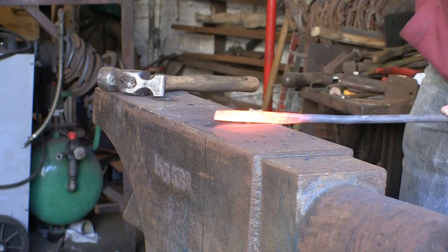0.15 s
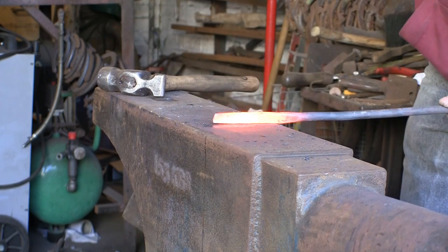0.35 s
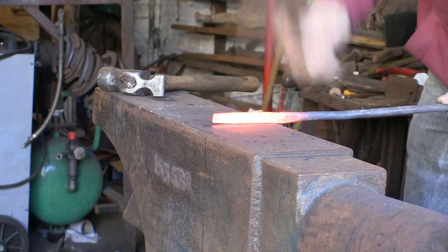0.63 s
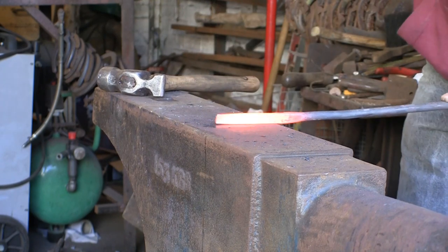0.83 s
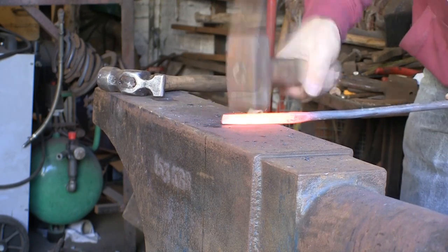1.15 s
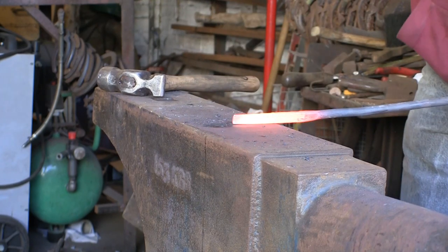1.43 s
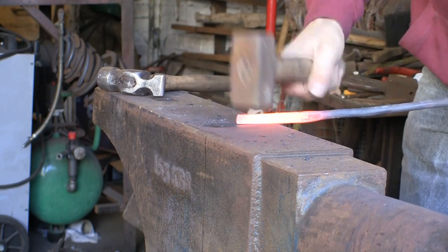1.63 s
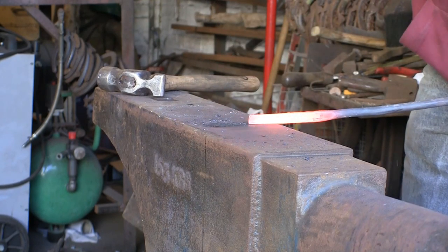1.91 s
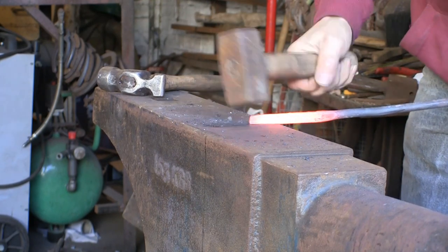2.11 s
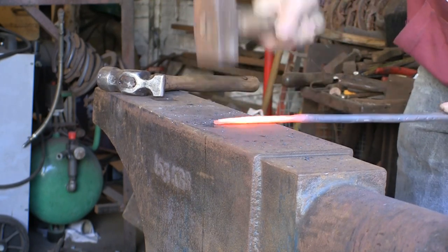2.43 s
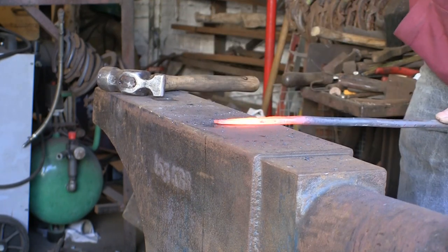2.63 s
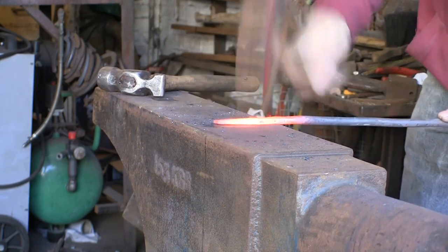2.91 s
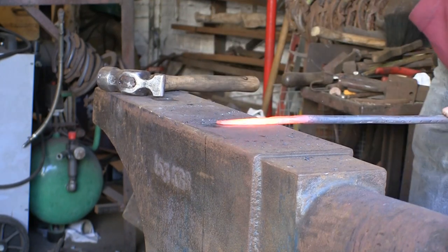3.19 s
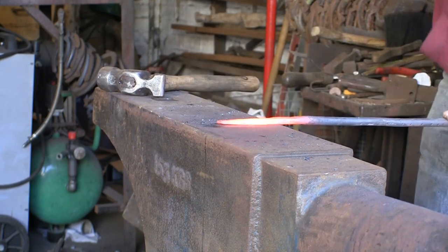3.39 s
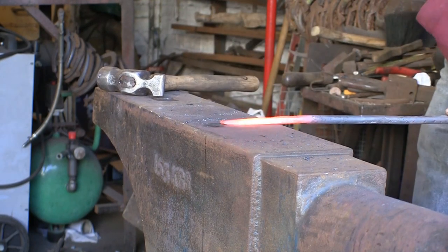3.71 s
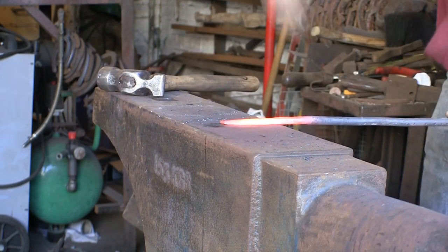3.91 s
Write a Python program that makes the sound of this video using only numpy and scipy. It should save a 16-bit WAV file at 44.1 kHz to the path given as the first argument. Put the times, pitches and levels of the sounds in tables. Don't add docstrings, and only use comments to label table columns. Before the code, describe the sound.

Forging at an anvil, heard close in stereo inside a cluttered workshop. Only a faint low blower rumble with a wavering, slowly rising blade hum and airy hiss is heard at first, plus a very quiet steady motor whine on the right. At 0.77 s a hand hammer hits the hot bar: a short midrange crack with a clear, bright anvil ring. Similar blows follow at 1.27 and 1.74 s, and a duller, less bright one at 2.2 s. At 2.37 s the bar is laid flat with a quick double clink, then tiny gritty flakes crackle near 2.44 s. Two harder blows at 3.04 and 3.56 s have less body, more steel-on-steel slap and glittering treble. Every blow leaves close echoes, a dense tail of a few tenths of a second and faint metallic shivering from surrounding tools. At about 4.03 s a soft, dull wooden knock closes it.

```python
import sys
import numpy as np
from scipy import signal
from scipy.io import wavfile

SR = 44100
rng = np.random.default_rng(int(sys.argv[2]) if len(sys.argv) > 2 else 0)


def store_wav(level_fs):
    pcm = np.round(np.clip(np.atleast_2d(level_fs), -1, 1) * 32767)
    wavfile.write(sys.argv[1], SR, pcm.T.astype(np.int16))


def boost(x):
    u = np.asarray(x, float) / 20
    return 10 ** u


N = 178781

# start in seconds, level in dB, hardness in dB (treble against body),
# level of the straight sound in dB, jolt in dB passed to a spare hammer lying on the anvil.
BLOWS = [
    (0.765, -32, -6.5, -1, 13),
    (1.267, -32.5, -4, 0.5, -2),
    (1.736, -32.5, -4, 0.5, 0.1),
    (2.195, -34.5, -12.5, 0, -11),
    (3.036, -39, 5.5, -3, 1),
    (3.558, -39, 4, -11, -7.5),
]
# start in seconds, peak in dB.
TAPS = [
    (2.366, -32),
    (2.382, -48),
]


def in_time(rows):
    s, *columns = np.transpose(rows)
    return [np.interp(np.arange(N) / SR, s, c) for c in columns]


def at_hz(points, hz):
    f, *columns = np.transpose(points)
    return [np.interp(np.log(hz), np.log(f), c) for c in columns]


def rms_one(x):
    return x / np.sqrt(np.mean(x ** 2) + 1e-20)


def pan(x, db):
    return x * boost(np.array([[db / 2], [-db / 2]]))


def sine(hz):
    return np.sqrt(2) * np.sin(2 * np.pi * np.cumsum(hz) / SR)


def high_pass(x, hz):
    return signal.sosfilt(signal.butter(2, hz, "high", fs=SR, output="sos"), x)


def resonate(x, hz, width):
    r = np.exp(-np.pi * width / SR)
    feedback = [1, -2 * r * np.cos(2 * np.pi * hz / SR), r * r]
    return signal.lfilter([(1 - r * r) / 2, 0, (r * r - 1) / 2], feedback, x + 1e-18)


def ring(clicks, hz, t60):
    r = boost(-60 / (t60 * SR))
    w = 2 * np.pi * hz / SR
    return signal.lfilter([0, np.sin(w)], [1, -2 * r * np.cos(w), r * r], clicks + 1e-18)


def clicks_at(times, levels_db):
    out = np.zeros(N)
    out[np.round(np.asarray(times) * SR).astype(int)] = boost(np.asarray(levels_db))
    return out


def drift(rate):
    r = np.exp(-80 * np.pi * rate / SR)
    slow = signal.lfilter([1], [1, -2 * r, r * r], rng.standard_normal(N // 40 + 2002))[2000:]
    return np.interp(np.arange(N) / 40, np.arange(len(slow)), rms_one(slow))


def stereo_bands(size):
    edges = 19 * 2 ** np.arange(0, 10.5, .5)
    white = rng.standard_normal((2, 2, size))
    for k, (low, high) in enumerate(zip(edges, edges[1:])):
        band = signal.butter(2, [low, high], "band", fs=SR, output="sos")
        mid, side = signal.sosfilt(band, white[k % 2])
        yield np.sqrt(low * high), mid, side * np.array([[1], [-1]])


def blend(mid, side, alike):
    alike = np.clip(alike, 0, 1)
    return np.sqrt(1 + alike) * mid + np.sqrt(1 - alike) * side


def scatter(x):
    for lag in (7, 16, 29):
        taps = np.r_[1, np.zeros(lag - 1), -.6]
        x = signal.lfilter(taps[::-1], taps, x + 1e-18)
    return x


def strength_db(hz):
    # pitch in Hz, share of hardness, offset in dB.
    regions = [(1330, 0.13, 0.5), (3680, 1, -1.63), (6460, 1.17, 0.66), (12200, 1.04, -10),
               (15300, 1.5, -12)]
    share, offset_db = at_hz(regions, hz)
    return np.transpose(BLOWS)[1] + share * np.transpose(BLOWS)[2] + offset_db


def on_flat():
    flat_from_db, flat_span_db = -3, 6
    return np.clip((np.transpose(BLOWS)[2] - flat_from_db) / flat_span_db, 0, 1)


def hammer():
    # pitch in Hz, width in Hz, level in dB.
    contact = [(130, 227, 2.5), (300, 350, -13), (568, 220, 8.5), (755, 820, 2), (1493, 207, 13.5),
               (2780, 574, 12), (4080, 1120, 11.5), (5980, 2070, 8.5), (6990, 1420, 11.5), (8830, 570, 9),
               (11540, 4800, 8), (15400, 3200, 1)]
    # pitch in Hz, time to fall 60 dB in seconds.
    anvil = [(545, .12), (1245, .2), (1305, .09), (1420, .12), (1506, .12), (1541, .17), (1592, .13),
             (1665, .08), (2467, .17), (2697, .08), (4697, .25), (5324, .32), (6245, .16), (6330, .2),
             (6720, .13), (6755, .17), (6812, .1), (7220, .11), (8215, .25), (8700, .03), (8909, .25),
             (14120, .15), (14430, .28), (14800, .28), (15110, .42), (15330, .7), (15560, .25)]
    # level on edge in dB, level on flat in dB, pan in dB.
    struck = [(-35.5, -54, -1), (-19, -28.5, -3), (-16, -9.5, -1), (-13, -7.5, 0), (-29, -25, -5),
              (-38, -16, 1), (-13, -8, 0), (-27, -27, -6), (-9, -9, -2), (-33, -40, 3), (-26, -19, 0),
              (-30.5, -19, -3), (-17, -9.5, 1), (-20, -11, -8), (-29, -31, 4), (-11, -11, -1),
              (-33, -9, 14), (-31, -24, 0), (-37, -30, -3), (-44, -3, -5), (-30, -7, 0), (-46, -29, 0),
              (-49, -22, -2), (-40, -23, -12), (-40, -18, -13), (-45, -30, 10), (-46, -30, -12)]
    spare = {1245: .3, 2467: .4, 5324: 1, 8215: 1}
    flutter_db, flutter_hz = 2.5, 25
    s, jolt_db = np.transpose(BLOWS)[[0, 4]]
    crack, ringing = np.zeros(N), np.zeros((2, N))
    for k, (hz, width, level_db) in enumerate(contact):
        push = clicks_at(s, strength_db(hz) + level_db + 25.0)
        crack += (-1) ** k * resonate(push, hz, width)
    for (hz, t60), (edge_db, flat_db, pan_db) in zip(anvil, struck):
        level_db = edge_db + (flat_db - edge_db) * on_flat() + jolt_db * spare.get(hz, 0)
        tone = ring(clicks_at(s, strength_db(hz) + level_db + 5.0), hz, t60)
        flutter = flutter_db * (1 + (hz / 12000) ** 2) * drift(flutter_hz)
        ringing += pan(tone * boost(flutter), pan_db)
    return scatter(crack), ringing


def first_arrival(crack):
    s, _, _, straight_db, _ = np.transpose(BLOWS)
    current_blow = np.searchsorted(s[1:] - .05, np.arange(N) / SR)
    return pan(crack * boost(straight_db)[current_blow], 3.5)


def slap():
    # start in seconds, peak in dB.
    slaps = [
        (3.036, -18),
        (3.5575, -13.5),
        (2.3662, -25.5),
    ]
    hz, t60 = 3880, 0.0034
    s, peak_db = np.transpose(slaps)
    swelling = ring(clicks_at(s, peak_db - 17.0), hz, t60)
    return pan(ring(swelling, hz, t60), 5.3)


def shiver(count=110):
    # pitch in Hz, level on edge in dB, level on flat in dB, time to fall 60 dB in seconds.
    rattling = [(705, -36, -27.5, 0.31), (2030, -39, -26, 0.39), (4500, -42, -28, 0.38),
                (9000, -41, -28.5, 0.31), (14500, -36, -20, 0.41)]
    spread_db, lag_s = 4, .008
    s, out = np.transpose(BLOWS)[0], 0
    pitches = np.geomspace(700, 15600, count) * rng.uniform(.985, 1.015, count)
    for hz, chance in zip(pitches, rng.standard_normal((count, 2, len(s) + 1))):
        edge_db, flat_db, t60 = at_hz(rattling, hz)
        level_db = strength_db(hz) + edge_db + (flat_db - edge_db) * on_flat() + 3.5
        level_db = level_db + spread_db * chance[0, 1:]
        clicks = clicks_at(s + lag_s * np.abs(chance[1, 1:]), level_db)
        out = out + pan(ring(clicks, hz, t60 * boost(chance[0, 0])), 8 * chance[1, 0])
    return high_pass(out, 500)


def bar():
    # pitch in Hz, level in dB, time to fall 60 dB in seconds, pan in dB.
    short_rings = [(607, -24, 0.027, -3), (1634, -23.5, 0.062, 0), (2070, -18, 0.0099, -4),
                   (3290, -6, 0.0065, 0), (4070, -4.5, 0.0067, -3), (5430, -6.5, 0.002, 4),
                   (6780, -17.5, 0.017, 0)]
    long_rings = [(2955, -28, .2, 0), (3203, -27, .1, 0), (3978, -18, .12, 0), (6325, -23, .09, 0)]
    s, peak_db = np.transpose(TAPS)
    out = 0
    for hz, db, t60, pan_db in short_rings + long_rings:
        out = out + pan(ring(clicks_at(s, peak_db + db), hz, t60), pan_db)
    return scatter(out)


def scale():
    # start in seconds, peak in dB.
    flakes = [
        (2.366, -54),
        (2.436, -53),
        (2.452, -60),
    ]
    t = np.arange(600) / SR
    grit = rng.standard_normal(600) * np.exp(-t / .003) * np.minimum(t / 0.00046, 1)
    puffs = signal.fftconvolve(clicks_at(*np.transpose(flakes)), grit)[:N]
    return pan(high_pass(puffs, 6000), -2)


def knock():
    # start in seconds, peak in dB.
    knocks = [
        (4.026, -44),
        (4.041, -56),
    ]
    # pitch in Hz, level in dB, time to fall 60 dB in seconds, pan in dB.
    board = [(152, -1, 0.068, -0.18), (222, -1.5, 0.073, 0), (623, -15, 0.0098, -1),
             (1460, -6.5, 0.011, -1)]
    s, peak_db = np.transpose(knocks)
    return sum(pan(ring(-clicks_at(s, peak_db + db), hz, t60), pan_db) for hz, db, t60, pan_db in board)


def workshop(x):
    # pitch in Hz, time to fall 60 dB in seconds, level in dB, left-right likeness 0-1, pan in dB.
    tail = [(99.54, 0.2, -3, 0.99, -5), (240, 0.5, -3, 0.91, 0.5), (597, 0.27, -2.5, 0.85, -4),
            (1400, 0.23, 4.5, 0.29, 2), (2870, 0.28, -1, 0, 2), (7100, 0.2, 3.5, 0.11, 3),
            (10200, 0.26, 3, 0.05, -5.5), (13000, 0.16, 3.5, 0.35, -0.5), (16000, 0.27, 2, 0.05, -4.5)]
    # delay in seconds, level in dB.
    echoes = [(.0062, -4), (.0095, -7), (.0128, -4)]
    sway_rad_per_s = 1.65
    t = np.arange(SR // 2) / SR
    build_up = np.clip((t - .0008) / .004, 0, 1)
    bunches = sum(boost(db - 0.5) * np.exp(-((t - delay) / 0.0006) ** 2) for delay, db in echoes)
    starts = np.sort(np.r_[np.transpose(BLOWS)[0], TAPS[0][0]])
    current = np.searchsorted(starts[1:] - .01, np.arange(N) / SR)
    turn = sway_rad_per_s * (starts - starts[0])[current]
    out = 0
    for share in (np.cos(turn), np.sin(turn)):
        answer = 0
        for hz, mid, side in stereo_bands(size=len(t)):
            t60, level_db, alike, pan_db = at_hz(tail, hz)
            answer = answer + pan(blend(mid, side, alike), pan_db) * boost(level_db - 60 * t / t60)
        out = out + signal.fftconvolve((share * x)[None], answer * (build_up + bunches), axes=1)[:, :N]
    return boost(-25) * out


def whine():
    # time in seconds, pole rate in Hz.
    pole_rate = [(0, 605.6), (2.0, 606.3), (3.0, 608.6), (4.06, 608.4)]
    # multiple of the pole rate, left level in dB rms, right level in dB rms.
    multiples = [(2, -87.5, -65.5), (3, -104, -83), (4, -105.5, -73.5), (6, -86.5, -79.5), (7, -90, -87),
                 (8, -93, -85), (11, -88, -81), (13, -82.5, -101)]
    phase = 2 * np.pi * np.cumsum(in_time(pole_rate)[0] + 0.278 * drift(2.12)) / SR
    out = 0
    for k, left, right in multiples:
        tone = np.sqrt(2) * np.sin(round(k) * phase + k * k)
        out = out + tone * boost(np.array([[left], [right]]) + 1.4 * drift(2.8))
    return out


def blower():
    # pitch in Hz, level in dB per Hz.
    air_levels = [(14, -31), (24, -1.5), (50, -7.5), (100, -10), (300, -18), (500, -17), (900, -25),
                  (1500, -23), (3000, -23.5), (5500, -26), (7000, -24.5), (9000, -27.5), (12400, -33),
                  (16000, -32)]
    # pitch in Hz, left-right likeness 0-1, pan in dB.
    air_stereo = [(60, .998, 0), (150, .99, 0), (300, .96, -.3), (640, .88, -.5), (1400, .35, -1),
                  (3100, .1, -1.5), (6800, .45, -2.5), (15000, .5, -3.5)]
    # time in seconds, tone level in dB.
    blade_load = [(0, -65), (.5, -62.5), (.87, -55.5), (1.05, -63), (1.3, -57.5), (1.95, -62.5),
                  (2.1, -56.5), (2.53, -66), (2.7, -59.5), (3.1, -65), (3.45, -57.5), (3.62, -63),
                  (3.87, -55.5), (4.06, -62)]
    # pitch in Hz, width in Hz, level in dB rms.
    duct_rings = [(122.7, 6.7, -64.5), (96, 66, -64.5), (303.2, 1.4, -75.5)]
    # pitch in Hz, level in dB rms.
    frame_tones = [(198.3, -70), (247.8, -72), (345, -74)]
    blade_hz = 70.6 + 2.4 * np.arange(N) / SR
    blade_db = in_time(blade_load)[0]
    air = 0
    for hz, mid, side in stereo_bands(size=N):
        alike, pan_db = at_hz(air_stereo, hz)
        level_db = at_hz(air_levels, hz)[0] + 0.88 * drift(24)
        air = air + pan(blend(mid, side, alike), pan_db) * boost(level_db)
    blade = sine(blade_hz + 4.77 * drift(12.5)) * boost(blade_db + 1.9 * drift(16))
    duct = 0
    for hz, width, db in duct_rings:
        duct = duct + boost(db) * rms_one(resonate(rng.standard_normal(N), hz, width))
    hum = sum(sine(hz + 0.66 * drift(2.5)) * boost(db + 1.4 * drift(13.0)) for hz, db in frame_tones)
    return rms_one(air) * boost(-64) + blade + duct + hum


def scene():
    crack, ringing = hammer()
    small, flakes = bar() + knock(), scale()
    room = workshop(crack + (boost(-7) * ringing + small + boost(-7) * flakes).mean(axis=0))
    strikes = first_arrival(crack) + slap() + ringing + small + flakes
    return strikes + room + blower() + whine() + shiver()


def top_cut(x):
    return signal.sosfilt(signal.butter(12, 16810, fs=SR, output="sos"), x)


def record(dry):
    cut = signal.sosfilt(signal.ellip(10, .5, 35, 15770, fs=SR, output="sos"), dry)
    return top_cut(cut)


dry = scene()
out = record(dry)
store_wav(out)
```